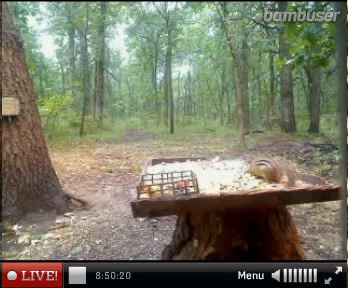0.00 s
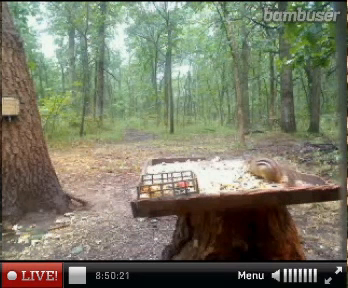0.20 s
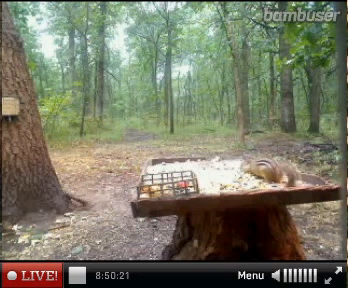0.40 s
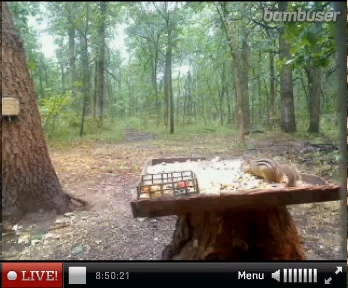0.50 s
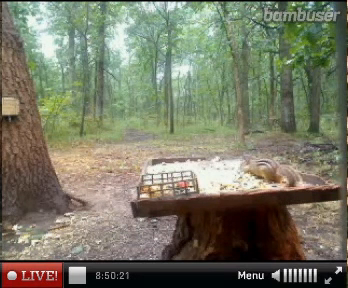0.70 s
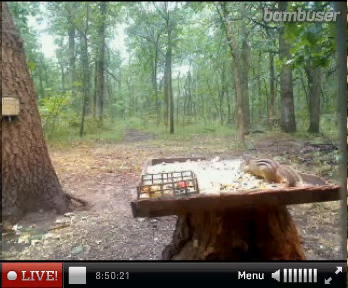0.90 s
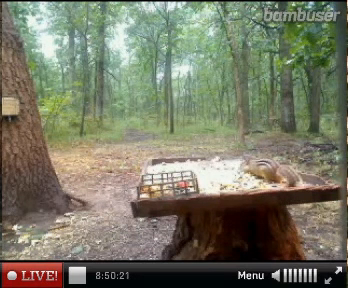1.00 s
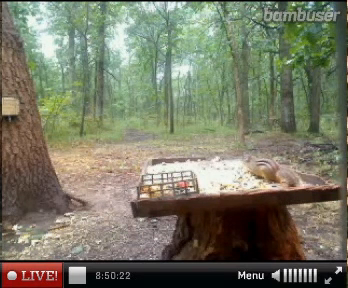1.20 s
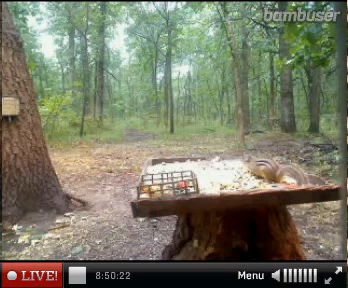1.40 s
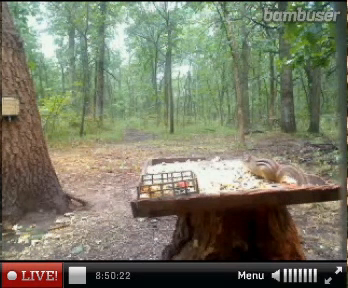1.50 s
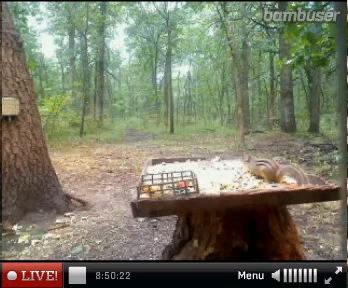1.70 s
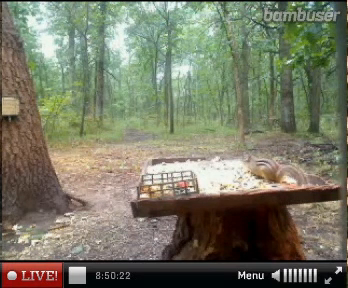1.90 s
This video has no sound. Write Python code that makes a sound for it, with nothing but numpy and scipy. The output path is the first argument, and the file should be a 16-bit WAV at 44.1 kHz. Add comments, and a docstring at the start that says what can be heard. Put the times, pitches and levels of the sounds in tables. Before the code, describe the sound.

Three abrupt chipmunk chips, each a tiny plunging whistle breaking into a louder hollow cluck, ring briefly among trees; faint nibbling and a barely audible far bird sit in quiet outdoor hiss.

```python
"""A chipmunk on a wooden feeding table close to the microphone chips three times in a woodland clearing.
Each chip is a thin, steeply falling whistle that breaks with a pop into a louder, low falling cluck.
Table, ground, leaf litter and trunks send the voice back as near echoes, quick scatter and a thin tail.
Short noise bursts make nibbling, mouth clicks and shifting seed husks; gliding tones make a far bird.
Shaped noise is the quiet rumble and hiss of the woods; the microphone dulls and cuts the top."""
import sys
import numpy as np
from scipy import signal
from scipy.fft import rfft, irfft
from scipy.io import wavfile
from scipy.ndimage import uniform_filter1d

SR = 44100
rng = np.random.default_rng(int(sys.argv[2]) if len(sys.argv) > 2 else 0)


def pcm_store(signal):
    """Save signal as 16-bit PCM."""
    levels = np.round(np.clip(np.atleast_2d(signal), -1, 1) * 32767)
    wavfile.write(sys.argv[1], SR, levels.astype(np.int16).T)


N = 85995  # length in samples

# Levels stand before throat, reflections and microphone. Noise colours are relative: noise has unit spread.

# Woods all around. Each row: frequency in Hz, relative level in dB per Hz.
WOODS_COLOUR = [(15, -48), (25, -57), (43, -13), (70, -4.5), (128, -2), (195, -1), (271, -4), (331, -5.5),
                (365, -7), (404, -5.5), (447, -9), (651, -8), (701, -13.5), (815, -10.5), (1600, -17.5),
                (3670, -22.5), (4160, -25), (6870, -28.5), (10000, -36), (13000, -52), (22000, -120)]
# High hiss of the woods. Each row: frequency in Hz, relative level in dB.
HISS_COLOUR = [(9000, 0), (10200, -15), (13000, -13), (14000, -10)]
WOODS_DB, WOODS_WAVER_DB, HISS_DB = -63, .5, -88

# Faint nibbling ticks. Each row: start in seconds, level in dB.
NIBBLE_TICKS = [(.14, -75.5), (1.399, -67), (1.457, -72), (1.83, -72)]
# Colour of a nibble. Each row: frequency in Hz, relative level in dB.
NIBBLE_COLOUR = [(1500, 12), (4000, 2), (6700, 4), (9800, -1), (13000, -13)]
NIBBLE_DECAY_S = .013

# The mouth opens just before a chip. Each row: start in seconds, level in dB.
MOUTH_OPENINGS = [(.2022, -56), (.928, -56), (1.625, -57)]
# Colour of a mouth click. Each row: frequency in Hz, relative level in dB.
MOUTH_COLOUR = [(600, -16), (1200, -3.5), (1600, 10), (2300, -13.5), (4300, -17), (7000, -23),
                (12000, -35.5)]
MOUTH_DECAY_S = .0024

# The whistle that opens each chip. Each row: start in seconds, length in seconds, first pitch in Hz,
# last pitch in Hz, level in dB, loudest point as share of the length, bend of the glide (over 1 falls late).
CHIP_WHISTLES = [(.2066, .0182, 5380, 2950, -38.5, .3, 1.4), (.9475, .0185, 5330, 3000, -33.3, .55, 1.35),
                 (1.6461, .018, 5280, 3050, -32.3, .58, 1.25)]
# The whistle's first overtone, shaped by the mouth. Each row: overtone frequency in Hz, level in dB.
OVERTONE_CURVE = [(6250, -15), (7000, -35), (8300, -17.5), (9500, -34), (11000, -32)]
# One value per chip: how much stronger the overtone is made at the start than at the end, in dB.
OVERTONE_TILTS_DB = [21, -7.5, -1]
# Air noise in the whistle. Each row: frequency in Hz, relative level in dB.
AIR_COLOUR = [(800, 10), (1300, 2.5), (2500, -12), (4500, 1), (7000, -14.5), (9500, -36), (13000, -7.5)]
AIR_DB = -29.5
WHISTLE_EDGE_DB, WHISTLE_END_DB = -16, -11  # tone at its start, and as it gives way to the cluck
WHISTLE_FADE_S = .0006

# The cluck that ends each chip. Each row: start in seconds, length in seconds, first pitch in Hz,
# last pitch in Hz, level in dB, bend of the glide (over 1 falls late).
CHIP_CLUCKS = [(.2230, .0188, 1420, 710, -21.9, 1.2), (.9671, .0167, 1310, 670, -23.4, 1.3),
               (1.6638, .0198, 1370, 750, -24.8, .78)]
# Air noise in the cluck. Each row: frequency in Hz, relative level in dB.
RASP_COLOUR = [(1500, -24.5), (2200, 10), (2800, -9.5), (3600, 11), (4500, -14), (6000, 2), (7200, -51.5),
               (9300, -14.5), (12000, -50.5)]
# The throat pops as the voice breaks. Each row: frequency in Hz, relative level in dB.
POP_COLOUR = [(1300, -42), (1550, 10.5), (1800, -10.5), (2200, -13.5), (2700, -33.5)]
CLUCK_ATTACK_S, CLUCK_RELEASE_S = .0033, .0085
RASP_DB, RASP_DECAY_S = -21.5, .0042
POP_DB, POP_DECAY_S = -11.5, .0092

# The small throat lets little bass out. Each row: frequency in Hz, gain in dB.
THROAT_CURVE = [(450, -18), (640, -3.5), (780, 1.5), (2600, -3), (3400, -7), (4100, 0)]

# Near reflections. Each row: delay in seconds, signed gain (negative flips the wave).
NEAR_REFLECTIONS = [(.00187, -.55), (.00487, .22), (.00556, -.18)]
# Scatter from the leaf litter. Each row: frequency in Hz, relative level in dB.
LITTER_COLOUR = [(600, -9), (1200, -6), (2500, -3), (4000, 0), (9000, 0), (13000, -6)]
# Tail from the trunks. Each row: frequency in Hz, relative level in dB.
TRUNKS_COLOUR = [(500, -23), (850, -3), (1000, -9), (1150, 1.5), (1300, -6), (1600, -11), (3000, 3),
                 (4200, 0), (6000, 1.5), (12000, -9)]
LITTER_DB, LITTER_T60_S, LITTER_ONSET_S = -15, .055, .008
TRUNKS_DB, TRUNKS_T60_S, TRUNKS_ONSET_S = -28.5, .5, .03
NEAR_TRUNK_S, NEAR_TRUNK_DB = .0175, -24  # echo from the closest tree

# Seed husks shift on the table. Each row: start in seconds, level in dB, decay in seconds.
HUSK_SHIFTS = [(0.707, -60.5, 0.0019), (0.7098, -51.5, 0.0051), (.716, -58.5, 0.0093)]
# Colour of a husk. Each row: frequency in Hz, relative level in dB.
HUSK_COLOUR = [(200, -11), (850, 8), (1700, 0), (2400, 10.5), (3200, -7), (5000, -3), (7000, -13),
               (10000, -15), (13000, -30)]

# Far bird notes. Each row: start in seconds, length in seconds, first pitch in Hz, last pitch in Hz, level in dB.
BIRD_NOTES = [(1.38, .14, 3790, 3770, -77), (1.53, .15, 2500, 2620, -79)]

# The microphone's uneven, dulled top. Each row: frequency in Hz, gain in dB.
MICROPHONE_CURVE = [(10200, -0.5), (10900, -12), (11900, -0.5), (13000, -12)]
TOP_HZ = 13700  # the microphone passes almost nothing above


def undb(db):
    """Decibels to gain."""
    return 10 ** (np.asarray(db) / 20)


def add(out, start, x):
    """Mix x into out from a time in seconds on."""
    i = int(start * SR)
    out[i:i + len(x)] += x[:len(out) - i]


def seconds(length):
    """Sample times of a sound of the given length."""
    return np.arange(int(length * SR)) / SR


def shape(x, points):
    """Filter by a curve of (Hz, dB) points, level beyond its ends."""
    hz, db = np.array(points, float).T
    f = np.maximum(np.fft.rfftfreq(N, 1 / SR), 1)
    gain = undb(np.interp(np.log(f), np.log(hz), db))
    return irfft(rfft(x) * gain, N)


def noise(points):
    """Noise of unit spread coloured by (Hz, dB) points, falling steeply beyond them."""
    low_skirt = (points[0][0] / 4, points[0][1] - 36)
    high_skirt = (points[-1][0] * 1.2, points[-1][1] - 60)
    x = shape(rng.standard_normal(N), [low_skirt, *points, high_skirt])
    return x / x.std()


def burst(points, decay):
    """A sudden puff of noise that dies away exponentially."""
    return noise(points) * np.exp(-np.arange(N) / SR / decay)


def walk(rate):
    """Smooth random wavering of unit spread, with `rate` fresh values a second."""
    k = int(SR / rate)
    steps = np.repeat(rng.standard_normal(N // k + 1), k)
    x = uniform_filter1d(uniform_filter1d(steps, k), k)[:N]
    return x / x.std()


def gate(t, length, attack, release):
    """Smooth attack, hold and release."""
    rise = np.sin(np.pi / 2 * np.clip(t / attack, 0, 1))
    fall = np.sin(np.pi / 2 * np.clip((length - t) / release, 0, 1))
    return (rise * fall) ** 2


def glide(first_hz, last_hz, progress):
    """Pitch and phase of a tone that slides between two pitches in equal ratios."""
    hz = first_hz * (last_hz / first_hz) ** progress
    return hz, 2 * np.pi * np.cumsum(hz) / SR


def woods():
    """A soft bed of rumble and hiss that barely wavers, under a steady, fainter high hiss."""
    level = undb(WOODS_DB + WOODS_WAVER_DB * walk(10.98))
    return level * noise(WOODS_COLOUR) + undb(HISS_DB) * noise(HISS_COLOUR)


def nibbles():
    """Nibbling: each tick is a faint, bright burst of noise."""
    out = np.zeros(N)
    for start, db in NIBBLE_TICKS:
        add(out, start, undb(db) * burst(NIBBLE_COLOUR, NIBBLE_DECAY_S))
    return out


def mouth_clicks():
    """The opening mouth: a very short burst of noise just ahead of each chip."""
    out = np.zeros(N)
    for start, db in MOUTH_OPENINGS:
        add(out, start, undb(db) * burst(MOUTH_COLOUR, MOUTH_DECAY_S))
    return out


def whistles(rough=.0083):
    """A thin, slightly rough tone swells and fades as it plunges, with an overtone and air noise."""
    out = np.zeros(N)
    for chip, tilt_db in zip(CHIP_WHISTLES, OVERTONE_TILTS_DB):
        start, length, first_hz, last_hz, db, crest, bend = chip
        t = seconds(length)
        progress = t / length
        jitter = rough * walk(2500)[:len(t)]  # roughens the pitch
        hz, phase = glide(first_hz, last_hz, progress ** bend + jitter)
        swell = undb(np.interp(progress, [0, crest, 1], [WHISTLE_EDGE_DB, 0, WHISTLE_END_DB]))
        overtone_db = np.interp(2 * hz, *np.array(OVERTONE_CURVE).T) + tilt_db * (.5 - progress)
        overtone = undb(overtone_db) * np.sin(2 * phase)
        air = undb(AIR_DB) * noise(AIR_COLOUR)[:len(t)]
        voice = swell * np.sin(phase) + overtone + air
        add(out, start, undb(db) * gate(t, length, WHISTLE_FADE_S, WHISTLE_FADE_S) * voice)
    return out


def clucks():
    """The voice breaks with a pop to a loud, nearly pure low tone with a little fading rasp."""
    out = np.zeros(N)
    for start, length, first_hz, last_hz, db, bend in CHIP_CLUCKS:
        t = seconds(length)
        _, phase = glide(first_hz, last_hz, (t / length) ** bend)
        tone = np.sin(phase)
        rasp = undb(RASP_DB) * burst(RASP_COLOUR, RASP_DECAY_S)[:len(t)]
        pop = undb(POP_DB) * burst(POP_COLOUR, POP_DECAY_S)[:len(t)]
        level = undb(db) * gate(t, length, CLUCK_ATTACK_S, CLUCK_RELEASE_S)
        add(out, start, level * (tone + rasp + pop))
    return out


def scatter(colour, t60, onset):
    """Dense echoes of unit energy that build up while decaying 60 dB per t60."""
    t = np.arange(N) / SR
    tail = noise(colour) * undb(-60 * t / t60) * np.minimum(t / onset, 1) ** 2
    return tail / np.sqrt(np.sum(tail ** 2))


def clearing(voice):
    """The direct voice with a few near reflections, quick leaf-litter scatter and a thin trunk tail."""
    response = undb(LITTER_DB) * scatter(LITTER_COLOUR, LITTER_T60_S, LITTER_ONSET_S)
    response += undb(TRUNKS_DB) * scatter(TRUNKS_COLOUR, TRUNKS_T60_S, TRUNKS_ONSET_S)
    add(response, 0, np.ones(1))  # direct path
    add(response, NEAR_TRUNK_S, undb([NEAR_TRUNK_DB]))
    for delay, gain in NEAR_REFLECTIONS:
        add(response, delay, np.array([gain]))
    return signal.fftconvolve(voice, response)[:N]


def husks():
    """Seed husks shifting on the table: dry noise bursts, each with its own decay."""
    out = np.zeros(N)
    for start, db, decay in HUSK_SHIFTS:
        add(out, start, undb(db) * burst(HUSK_COLOUR, decay))
    return out


def far_bird():
    """Two faint whistled notes, fluttering in level and phase on their way through the trees."""
    out = np.zeros(N)
    for start, length, first_hz, last_hz, db in BIRD_NOTES:
        t = seconds(length)
        level = undb(db + 3 * walk(80.5)[:len(t)]) * gate(t, length, attack=.036, release=.021)
        _, phase = glide(first_hz, last_hz, t / length)
        flutter = 2.1 * walk(83)[:len(t)]  # radians
        add(out, start, level * np.sin(phase + flutter))
    return out


def scene():
    """The chipmunk in its clearing over the quiet of the woods, as one channel."""
    voice = shape(whistles() + clucks(), THROAT_CURVE)
    small_sounds = nibbles() + mouth_clicks() + husks()
    return (woods() + small_sounds + clearing(voice) + far_bird())[None]


def record(dry):
    """The microphone dulls the treble unevenly, then a steep low-pass cuts the top."""
    dulled = shape(dry, MICROPHONE_CURVE)
    top_cut = signal.ellip(8, .2, 70, TOP_HZ, fs=SR, output="sos")  # order, ripple dB, rejection dB
    return signal.sosfilt(top_cut, dulled)


dry = scene()
out = record(dry)
pcm_store(out)
```